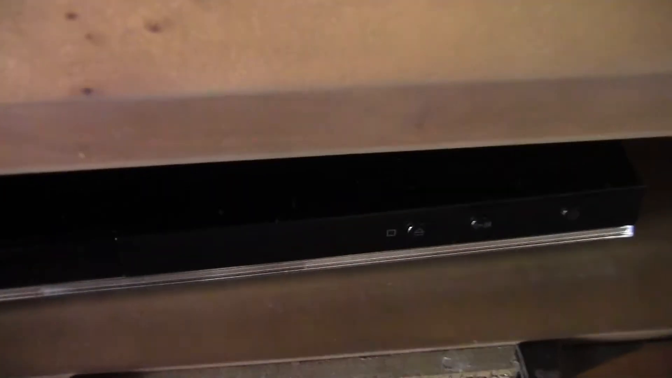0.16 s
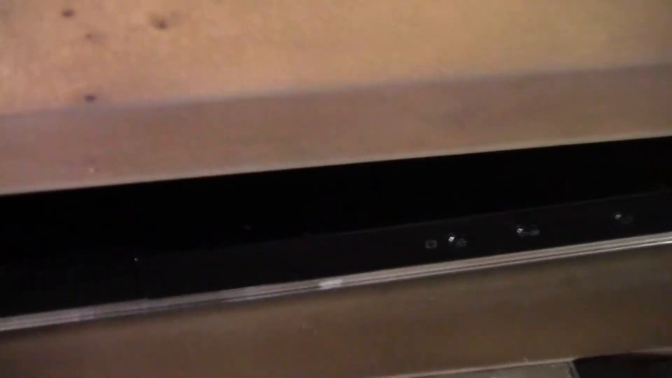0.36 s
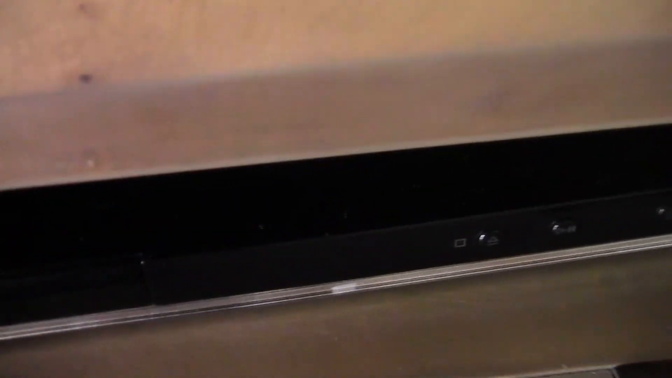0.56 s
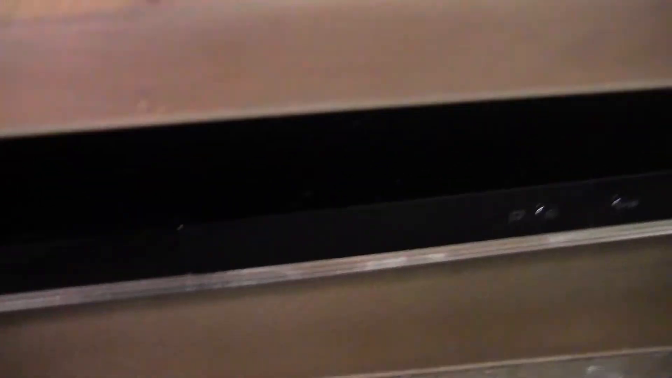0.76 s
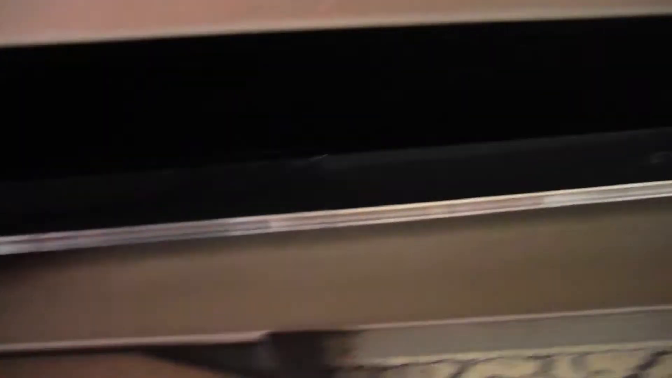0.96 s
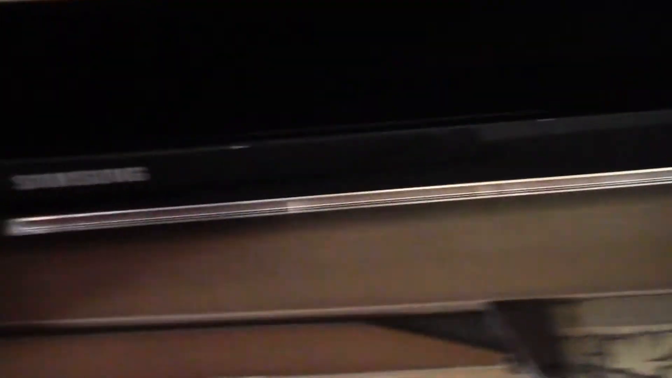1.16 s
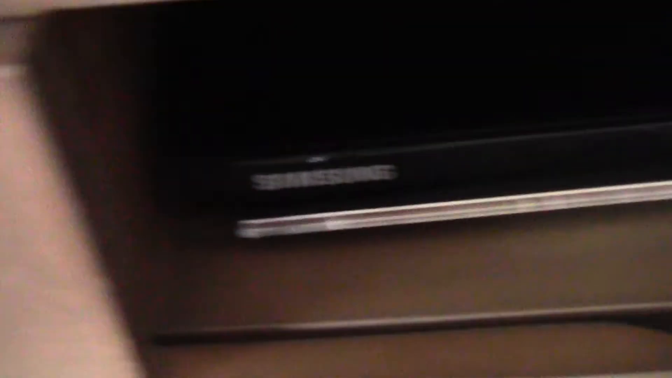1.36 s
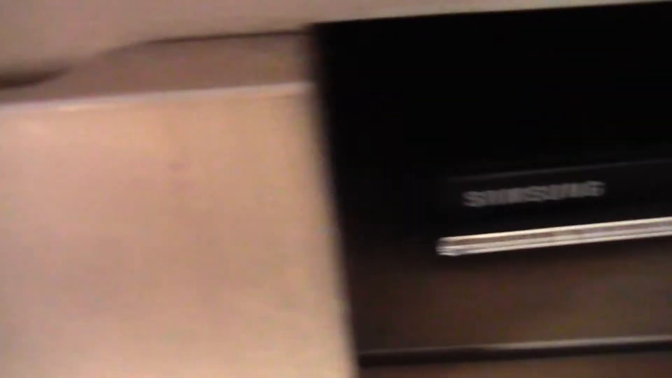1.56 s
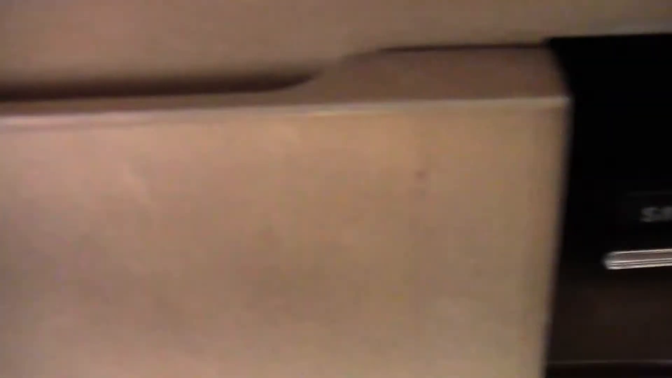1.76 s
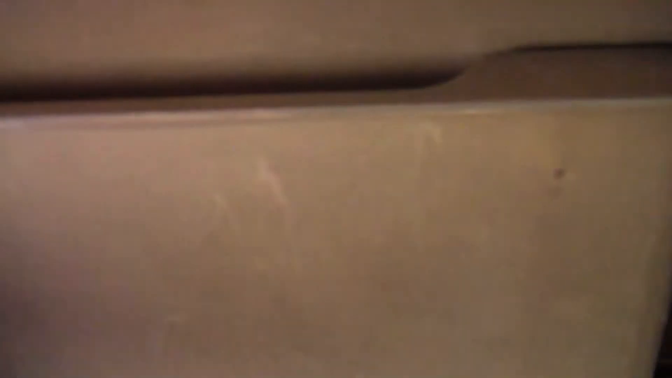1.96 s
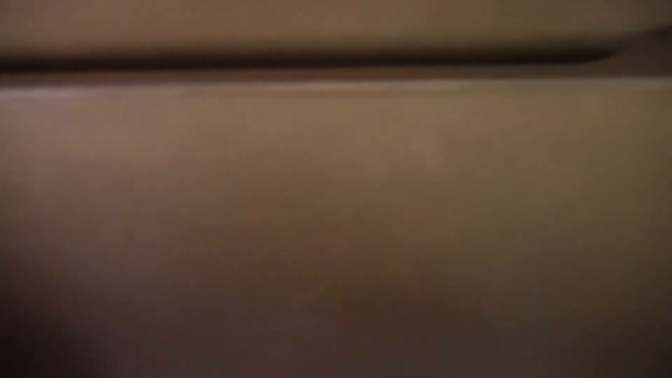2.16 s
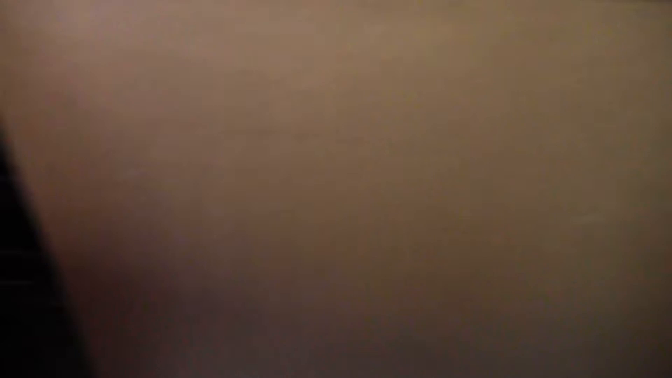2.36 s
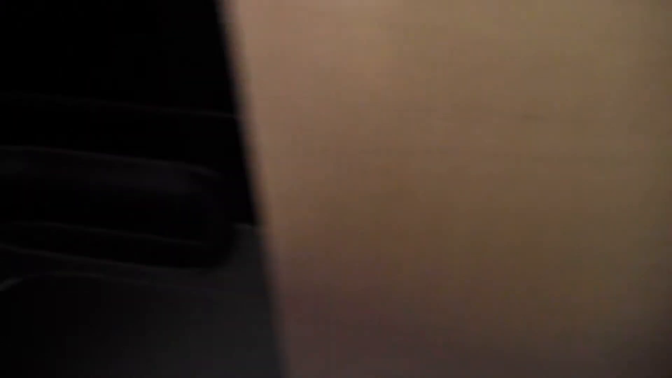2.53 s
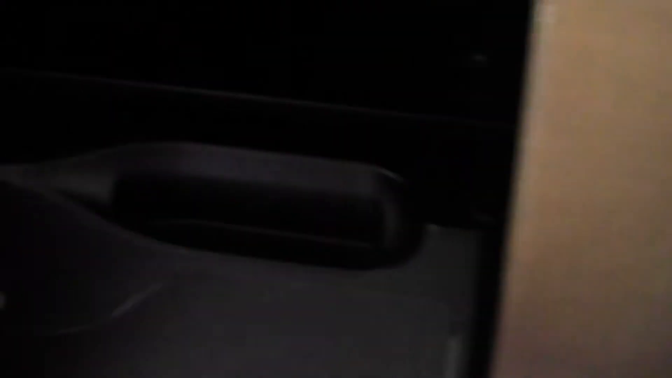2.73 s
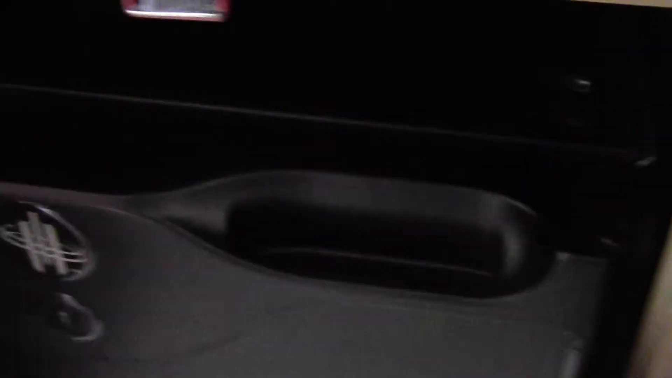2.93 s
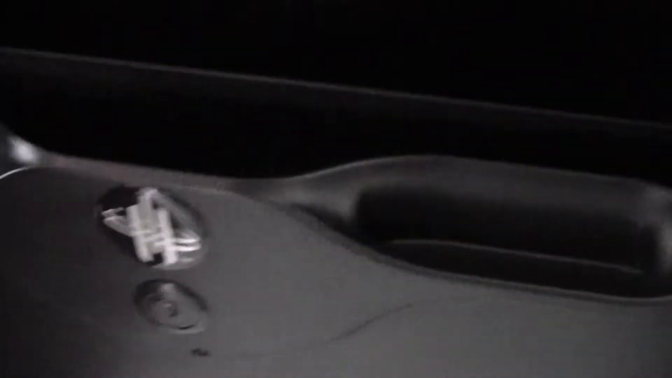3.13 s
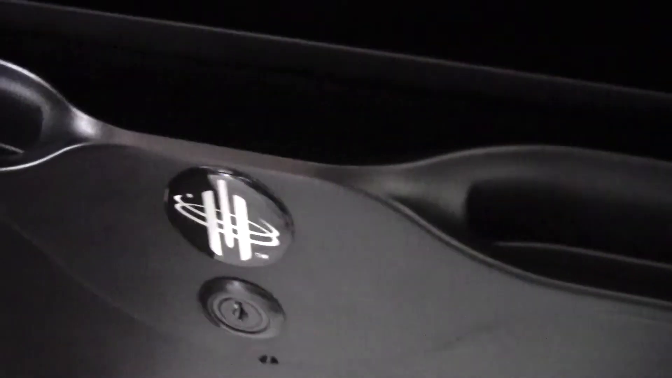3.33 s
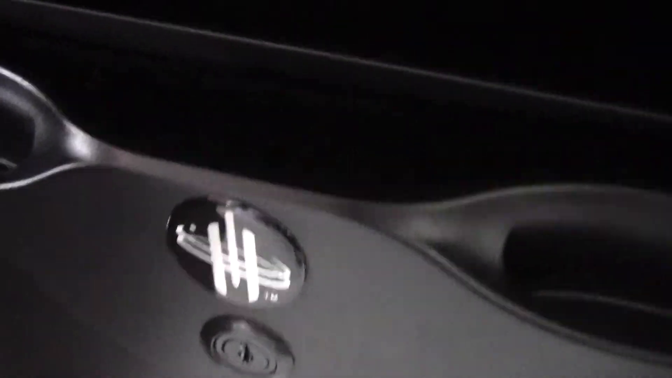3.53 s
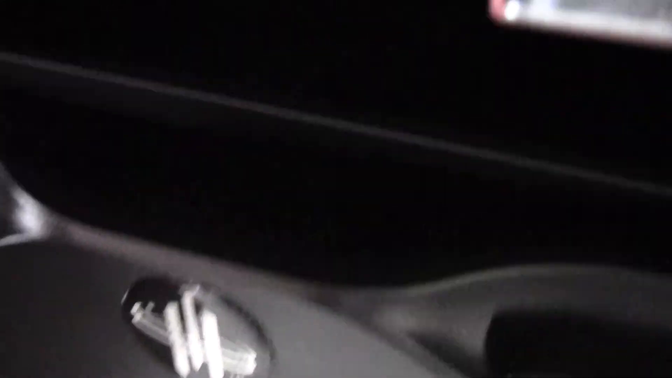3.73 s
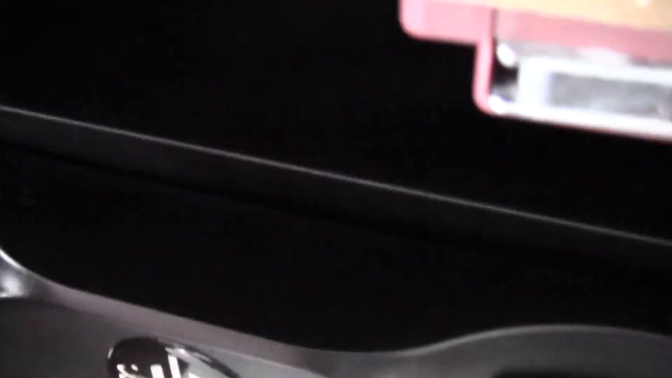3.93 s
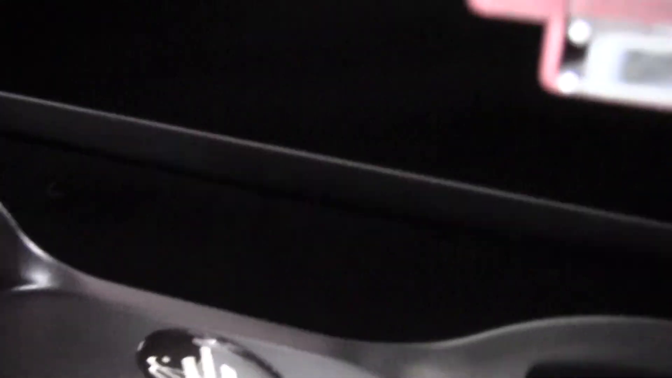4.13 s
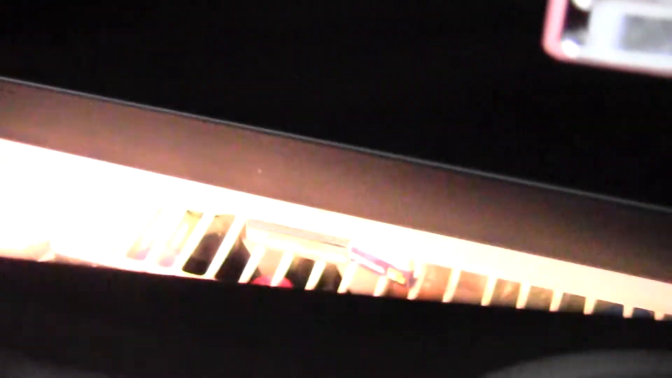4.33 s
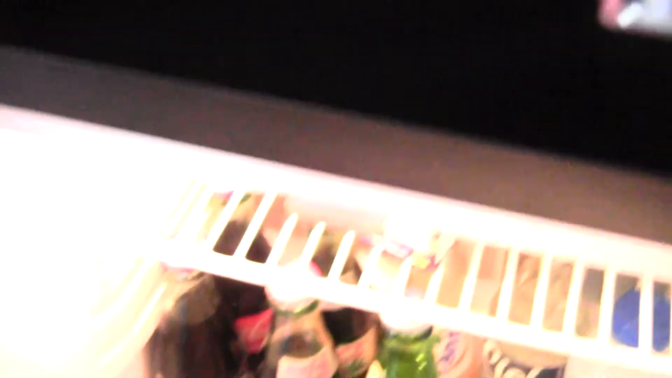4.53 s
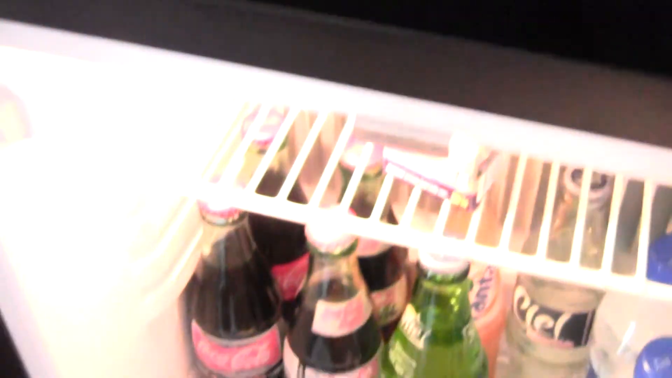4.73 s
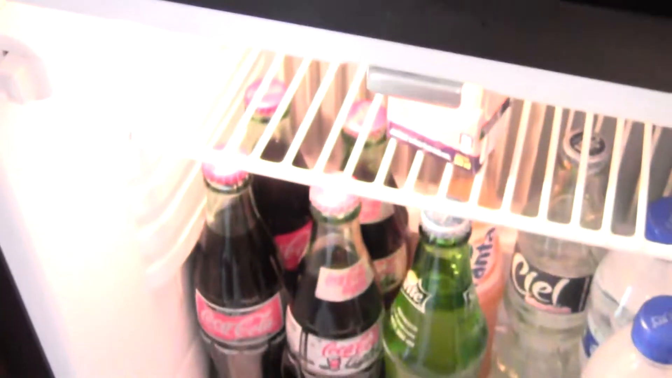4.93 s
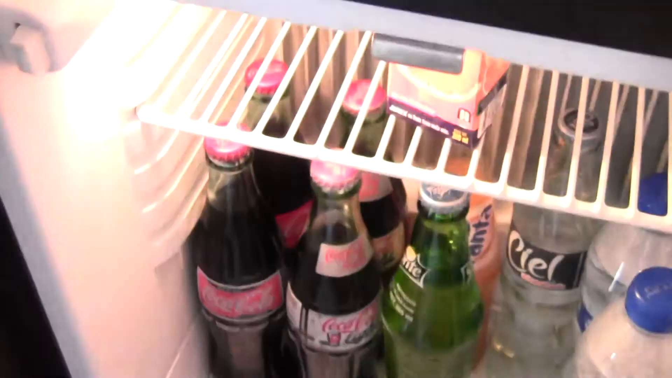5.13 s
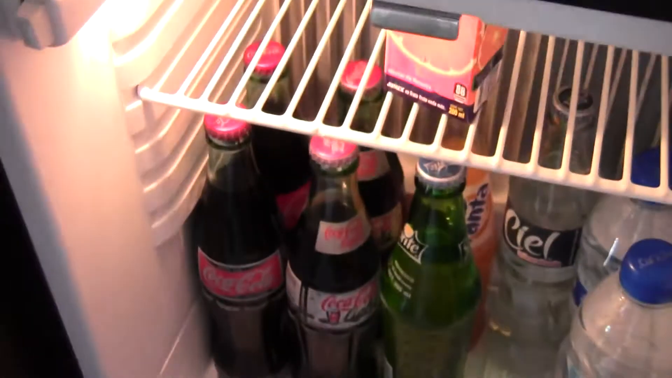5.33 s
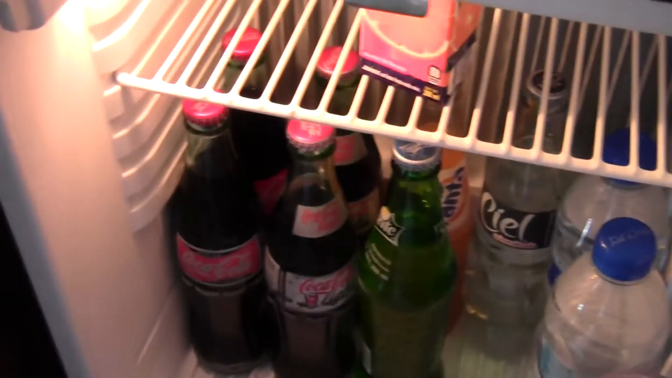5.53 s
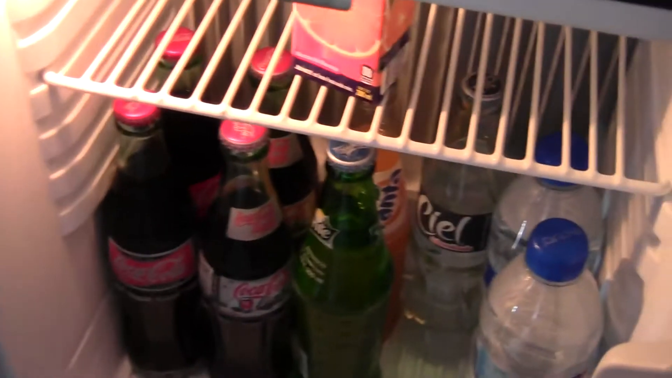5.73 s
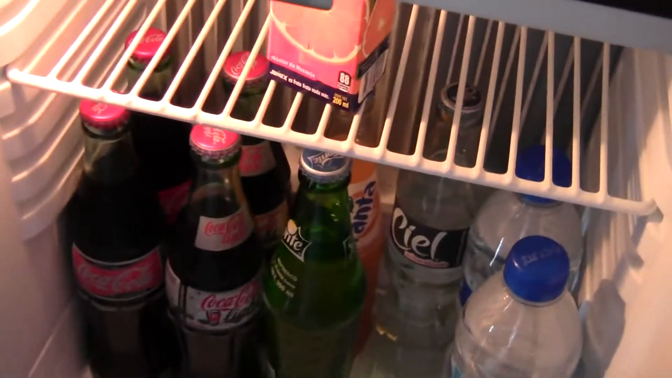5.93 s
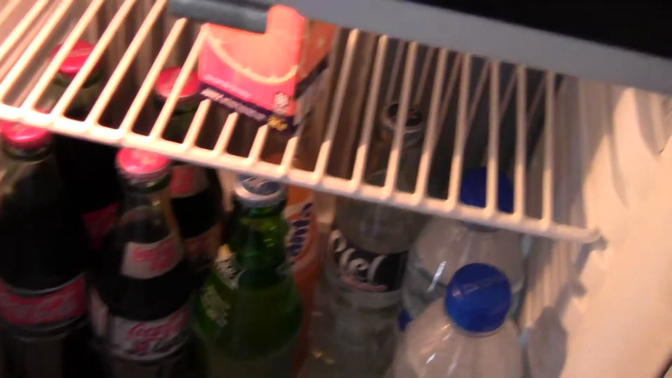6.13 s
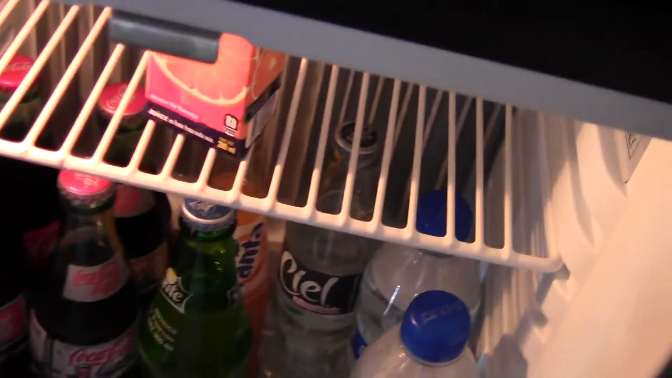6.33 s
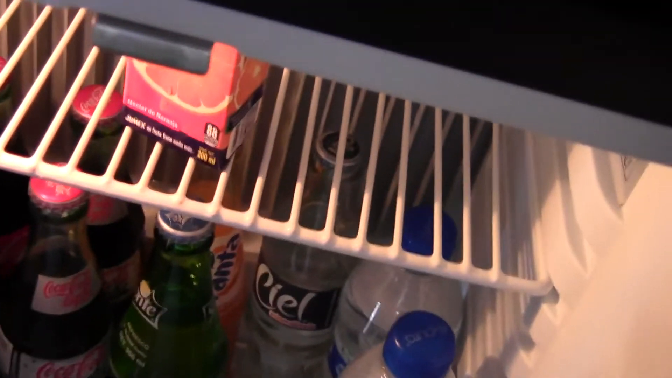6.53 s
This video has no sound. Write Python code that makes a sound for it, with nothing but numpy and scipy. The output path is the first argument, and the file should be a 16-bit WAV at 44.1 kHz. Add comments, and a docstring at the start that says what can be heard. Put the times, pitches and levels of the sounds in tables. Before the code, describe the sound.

Over a steady hum, a cabinet catch clacks, and a fridge door opens with dull thumps, a rattling rack and clinking bottles.

```python
"""A minibar fridge is tugged open close to a hand-held camera's stereo microphone, in a small humming room.
First the wooden cabinet around it snaps off its catch, and its panels ring. Then the fridge's seal
ticks loose, its door flexes and booms, the plastic rack rattles and glass bottles clink against each
other. At the end the swinging door bumps the cabinet. A finger taps the camera once, and mains hum,
fan tones and a faint hiss lie underneath."""
import sys
import numpy as np
from scipy import signal
from scipy.fft import rfft, irfft
from scipy.io import wavfile

SR = 44100
rng = np.random.default_rng(int(sys.argv[2]) if len(sys.argv) > 2 else 0)


def to_wav(sig):
    """Store sig (one row per channel, or 1-D mono) as 16-bit WAV at the path in sys.argv[1].

    Samples outside -1..1 are clipped; the rate is SR.
    """
    pcm = np.clip(np.atleast_2d(sig), -1, 1) * 32767
    pcm = np.round(pcm).astype(np.int16)
    wavfile.write(sys.argv[1], SR, pcm.T)  # frames by channels


N = 294489
TIME = np.arange(N) / SR
AGE = np.arange(SR * 3 // 4) / SR  # seconds since a blow

# The small room's decay. Each row: frequency in Hz, t60 in seconds.
ROOM_RING = [(100, 0.28), (400, 0.74), (1500, 0.68), (4000, 0.48), (8000, 0.53), (14000, 0.25)]
# Treble reaches the two microphone ports out of step. Each row: frequency in Hz, side against mid in dB.
PORT_SIDE = [(300, -32), (2000, -19.5), (5000, -16), (9000, -11), (13000, 3)]
# Steady noise at the two ports. Each row: frequency in Hz, left-right likeness from 0 to 1.
PORT_LIKENESS = [(60, 0.93), (150, 1), (380, 0.58), (950, 0.6), (2380, 0.67), (5980, 0.6), (15000, 0.36)]
# The colours of room tone and hiss. Each row: frequency in Hz, relative density in dB.
ROOM_TONE_COLOUR = [(25, -6), (50, -5), (90, 4.5), (160, 2.5), (290, 2.5), (400, -4.5), (600, -4.5),
                    (1000, -9.5), (1700, -12), (3000, -20.5), (5000, -29), (9000, -36.5), (12500, -41),
                    (16000, -44.5)]
HISS_COLOUR = [(200, -18.5), (600, 12), (1800, 6), (4000, 0.5), (7000, -3), (9500, -6), (12000, -14.5),
               (16000, -30)]
# The hiss sinks once the microphone is at the fridge. Each row: time in seconds, level in dB.
HISS_LEVEL = [(0, -56), (.52, -61.5), (1.3, -62.5), (4.2, -63.5), (5.6, -67), (6.68, -80)]
# Brief swells of the hiss. Each row: peak time in seconds, level in dB.
HISS_SWELLS = [(.76, -62.5), (2.98, -56), (3.23, -57.5), (3.76, -67), (4.06, -61), (5.21, -62), (5.58, -65)]
# Appliance hum. Each row: multiple of the mains frequency, opening level in dB.
MAINS_HARMONICS = [(1, -48), (2, -57.5)]
# Fan tones. Each row: pitch in Hz, opening level in dB, waver from 0 to 1.
FAN_TONES = [(558, -62, .55), (517, -71, .8), (101, -62, 0.9), (241.3, -71, 0.1), (303, -62.5, 0.93)]
# The hum changes as the microphone moves through the room. Each row: time in seconds, gain in dB.
HUM_GAIN = [(0, 0), (1.5, 1.5), (2.7, -2.5), (3.6, -5), (5.3, -3.5), (6.68, -7)]
# A finger on the camera body. Each row: start in seconds, level in dB, pitch in Hz, t60 in seconds.
CAMERA_BUMPS = [(3.2058, -20.5, 239, 0.041)]

# Dense modes of struck wood and plastic. Each row: frequency in Hz, relative density in dB.
WOOD_COLOUR = [(25, -13), (70, -4), (180, 17), (620, 3), (850, -2.5), (1650, 5.5), (2100, -2.5), (2700, 3),
               (3900, -8.5), (4700, -8), (5600, -15.5), (9500, -23.5), (12000, -38), (16000, -65)]
PLASTIC_COLOUR = [(30, 4), (90, 3.5), (200, 6), (370, -4.5), (680, -1), (1100, -8), (1600, -3), (2100, -8),
                  (2800, -8.5), (4000, -13.5), (7500, -23), (10000, -31.5), (12500, -45), (14500, -62.5),
                  (16000, -65)]
# Their decay. Each row: frequency in Hz, base t60 in seconds.
WOOD_RING = [(100, 0.2), (600, 0.36), (2000, 0.074), (5000, 0.02), (12000, 0.14)]
PLASTIC_RING = [(100, 0.067), (700, 0.16), (2000, 0.1), (5000, 0.086), (12000, 0.078)]
# Strong modes of the cabinet, the rack and the bottles, which ring at slightly different pitches.
# Each row: pitch in Hz, relative level in dB, base t60 in seconds.
CABINET_MODES = [(205, -6, 0.13), (257.7, 7, 0.25), (292.4, 5, 0.21), (535, -15, 0.091), (612, -15.5, 0.41),
                 (671, -7.5, 0.38), (925, -16, 0.26), (1479, -11, 0.16), (1775, -12, 0.09)]
RACK_MODES = [(482.5, -16, 0.49), (654.3, -3.5, 0.14), (782, -2, 0.038), (951, -7.5, 0.15),
              (1140, -9.5, 0.18), (1375, -10.5, 0.26), (2730, -24, 0.049)]
GLASS_MODES = [(3284, 1.5, 0.22), (3380, -13, 0.724), (3420, -8.5, .24), (3490, -11.5, 0.24),
               (3555, -9, 0.22), (4070, -29.5, .3), (5470, -22.5, 0.36), (5685, -38, 0.27),
               (6100, -19.5, 0.042), (6290, -16.5, 0.083), (6363, -16, 0.27), (6580, -16, 0.17),
               (6520, -18, 0.094), (8150, -19.5, 0.1), (8830, -24, 0.17), (8850, -34, 0.091),
               (9570, -27.5, 0.089), (9570, -25, 0.17), (10070, -33, 0.084), (10900, -36.5, 0.0893)]
# Blows as the cabinet opens, and as the swinging door bumps it. Each row: start in seconds, level in dB,
# treble and bass against that level in dB, ring time factor, pitch of the struck spot in Hz.
CABINET_BLOWS = [(1.468, -43.5, -10.5, -15, 4.3, 2140), (1.783, -43, 6.5, -11, 1.7, 2920),
                 (1.821, -27, -16.5, -6, 0.91, 1700), (1.936, -16.5, 14.5, 3, 0.35, 4870),
                 (1.938, -20, 4.5, -8.5, .7, 4700), (1.9435, -9.5, -10, -8, 0.48, 560),
                 (1.950, -17.5, -7.5, -18, 0.65, 2540), (1.965, -22, -2, -4.5, 1.06, 2440),
                 (1.986, -35.5, -9, 8, 1.43, 299), (2.0425, -26.5, 5.5, -17, 0.91, 6900),
                 (2.046, -24.5, 6, -10, 0.45, 3600)]
DOOR_BUMPS = [(5.825, -49, -2, -16, 0.54, 3320), (5.861, -34, -35, 7.5, 0.97, 368),
              (5.8885, -36.5, -1.5, 0, 0.31, 1320), (5.893, -31.5, -8, 5, 0.58, 805),
              (6.103, -46, -23, 9.5, 1.8, 350)]
# The sticky door seal letting go. Each row: start in seconds, level in dB.
SEAL_TICKS = [(4.133, -50), (4.214, -48.5), (4.283, -40.5), (4.346, -29), (4.353, -38), (4.357, -30.5)]
# Door panels flexing under hand and load. Each row: start in seconds, level in dB, base pitch in Hz.
PANEL_BOOMS = [(1.654, -20, 107), (1.822, -29, 73), (1.936, -26, 77), (1.948, -29, 154), (2.271, -35, 105),
               (4.193, -30.5, 143), (4.314, -18, 126.4), (4.34, -26.5, 130), (4.426, -18, 169.6),
               (4.528, -16, 186), (4.625, -14, 191.5), (4.755, -23, 193.7), (4.87, -16, 182),
               (4.932, -20, 174.5), (5.895, -29.5, 77), (5.907, -31.5, 154.3), (6.112, -36.5, 80),
               (6.139, -31.5, 151)]
# A flexing panel's modes. Each row: ratio to the base pitch, relative level in dB, t60 in seconds.
PANEL_MODES = [(0.98, 1.5, 0.23), (.84, -8.5, 0.49)]
# Knocks of the fridge door and its rack. Each row: start in seconds, level in dB,
# treble and bass against that level in dB, pitch of the struck spot in Hz.
RACK_KNOCKS = [(3.346, -41.5, -10, -25, 2040), (4.042, -40.5, 6.5, 6.5, 3090), (4.191, -37, 9.5, 9.5, 8200),
               (4.289, -23, 16.5, 6, 1110), (4.317, -26, 17.5, 8.5, 590), (4.394, -22.5, -28, -8, 670),
               (4.516, -23, -12, -3, 626), (4.533, -16.5, -23, -10, 900), (4.619, -23.5, 6, 2.5, 830),
               (4.690, -31, -14, 7, 1020), (4.755, -29.5, -14, -6, 680), (4.775, -28.5, -13, -11, 655),
               (4.826, -22, 1.5, -19, 2770), (4.866, -19.5, -11, -17, 1800),
               (4.906, -27.5, -1.5, -18, 1320), (4.932, -30.5, -2, 8, 1260)]
# How hard the pull shakes the loose load. Each row: time in seconds, level in dB.
LOAD_SHAKE = [(4.255, -40.5), (4.3, -22.5), (4.37, -26.5), (4.43, -34.5), (4.49, -25.5), (4.59, -32.5)]
# Bottles touching. Each row: start in seconds, level in dB, brightness in dB per octave,
# ring time factor, partial that the point of contact favours in Hz.
CLINKS = [(4.292, -37.5, 11, 1.3, 5500), (4.319, -14.5, 7, 0.34, 8800), (4.459, -30.5, 7.5, .75, 8800),
          (4.495, -39.5, 13.5, 0.5, 6400), (4.518, -16, 9, 0.57, 3187), (4.563, -28.5, -15, 1.2, 3114),
          (4.794, -41.5, 2, 1.4, 5550), (4.894, -41, 1, 1.2, 8870), (4.929, -51, -3, 1.1, 3510)]


def amp(db):
    return 10 ** (np.asarray(db) / 20)


def unit_rms(x):
    return x / np.sqrt(np.mean(x ** 2) + 1e-20)


def at_hz(points, hz):
    """Reads a table on a log-frequency axis."""
    table_hz, value = np.transpose(points)
    return np.interp(np.log(hz + 1), np.log(table_hz + 1), value)


def follow(curve):
    """Reads a time curve at every sample."""
    return np.interp(TIME, *np.transpose(curve))


def add(mix, start_s, sound):
    part = mix[round(start_s * SR):][:len(sound)]
    part += sound[:len(part)]


def drift(rate_hz):
    """A slow random wander of rms 1."""
    hz = np.fft.rfftfreq(N, 1 / SR)
    return unit_rms(irfft(rfft(rng.standard_normal(N)) * np.exp(-(hz / rate_hz) ** 2), N))


def coloured(x, db_at, size=2048):
    """Minimum-phase filter with the given dB at each frequency."""
    hz = abs(np.fft.fftfreq(size, 1 / SR))
    log_gain = np.log(amp(np.maximum(db_at(hz), -100)))
    impulse = np.fft.ifft(np.exp(np.conj(signal.hilbert(log_gain)))).real
    return signal.fftconvolve(x, impulse)[:len(x)]


def decay(t60):
    """Falls by 60 dB in t60 seconds."""
    return np.exp(-np.log(1000) * AGE / t60)


def dying_noise(ring, stretch=1, count=14):
    """A dense crowd of modes: white noise whose bands each die at their own speed."""
    hz = np.fft.rfftfreq(len(AGE), 1 / SR)
    white = rfft(rng.choice([-1, 1], len(AGE)))
    centres = np.geomspace(60, 15000, count)
    bands = np.array([irfft(white * at_hz(np.c_[centres, row], hz), len(AGE)) for row in np.eye(count)])
    return (bands * decay(stretch * at_hz(ring, centres)[:, None])).sum(0)


def ring_modes(hz, db, t60, phase):
    """A sum of dying sines, with phases in cycles."""
    return amp(db) @ (decay(t60[:, None]) * np.sin(2 * np.pi * (hz[:, None] * AGE + phase[:, None])))


def room(x, wet_db, side_db=-12, build_s=0.0057, dull_hz=11000):
    """A close source in a small furnished room; the tail differs a little between the microphone ports."""
    build = 1 - np.exp(-(AGE / build_s) ** 2)
    dull = signal.butter(1, dull_hz, fs=SR)
    tails = [signal.lfilter(*dull, dying_noise(ROOM_RING)) * build for _ in range(2)]
    mid, side = (amp(wet_db) * signal.fftconvolve(x, tail / np.linalg.norm(tail))[:N] for tail in tails)
    out_of_step = irfft(1j * rfft(x) * amp(at_hz(PORT_SIDE, np.fft.rfftfreq(N, 1 / SR))), N)
    side = amp(side_db) * side + out_of_step
    return x + mid + np.array([side, -side])


def air(colour, swell_db):
    """Steady noise at two closely spaced microphone ports, most alike in the bass."""
    hz = np.fft.rfftfreq(N, 1 / SR)
    likeness = at_hz(PORT_LIKENESS, hz)
    spectra = rfft(rng.standard_normal((2, N))) * amp(at_hz(colour, hz))
    mid, side = spectra * np.sqrt([1 + likeness, 1 - likeness])
    return unit_rms(irfft(np.array([mid + side, mid - side]), N)) * amp(swell_db * drift(rate_hz=1.5))


def hiss(swell_s=0.077):
    """A faint hiss with a few soft swells."""
    swells = sum(amp(db) ** 2 * np.exp(-((TIME - s) / swell_s) ** 2) for s, db in HISS_SWELLS)
    return np.sqrt(amp(follow(HISS_LEVEL)) ** 2 + swells) * air(HISS_COLOUR, swell_db=0.5)


def hum(mains_hum_hz=119.9, waver_hz=7):
    """Mains hum and wavering fan tones change with the microphone's place, the hum's fundamental least."""
    out = np.zeros(N)
    gain = amp(follow(HUM_GAIN))
    for multiple, db in MAINS_HARMONICS:
        level = amp(db) * gain ** (0.49 if multiple == 1 else 1)
        out += level * np.sqrt(2) * np.sin(2 * np.pi * multiple * mains_hum_hz * TIME)
    for hz, db, waver in FAN_TONES:
        phasor = np.sqrt(2 * (1 - waver ** 2)) + waver * (drift(waver_hz) + 1j * drift(waver_hz))
        out += amp(db) * gain * (phasor * np.exp(2j * np.pi * hz * TIME)).real
    return out


def camera_bump(dull_hz=1500):
    """Handling noise: a finger's dull tap reaches the microphone through the housing."""
    out = np.zeros(N)
    for s, db, hz, t60 in CAMERA_BUMPS:
        add(out, s, amp(db) * decay(t60) * np.cos(2 * np.pi * hz * AGE))
    return signal.lfilter(*signal.butter(2, dull_hz, fs=SR), out)


def struck_panel(blows, colour, ring, modes, modes_db, bass_hz, treble_hz, detune,
                 spot_db, spot_octaves, snap, snap_s):
    """Blows set off a panel's dense modes and its few strong ones; hard ones are bright, heavy ones deep."""
    out = np.zeros(N)
    mode_hz, mode_db, mode_t60 = np.transpose(modes)
    phase = np.arange(len(modes)) / 2  # neighbouring modes start in opposite directions
    colour_rms = np.sqrt(np.mean(amp(at_hz(colour, np.linspace(0, SR / 2, len(AGE)))) ** 2))
    for s, db, treble_db, bass_db, stretch, spot_hz in blows:
        def tilt(hz):
            spot = spot_db * np.exp(-(np.log2((hz + 1) / spot_hz) / spot_octaves) ** 2)
            treble = treble_db * hz ** 2 / (hz ** 2 + treble_hz ** 2)
            bass = bass_db / (1 + (hz / bass_hz) ** 4)
            return spot + treble + bass
        contact = 1 + snap / stretch * np.exp(-AGE / snap_s)  # the first wavefront stands out
        crack = coloured(contact * dying_noise(ring, stretch), lambda hz: at_hz(colour, hz) + tilt(hz))
        pitch = mode_hz * (1 + detune * rng.standard_normal(len(modes)))
        tone = ring_modes(pitch, mode_db + modes_db + tilt(mode_hz), mode_t60 * np.sqrt(stretch), phase)
        add(out, s, amp(db) * (crack / colour_rms + tone))
    return out


def cabinet_door():
    """The wooden door snaps off its catch, close to the microphone."""
    return struck_panel(CABINET_BLOWS, WOOD_COLOUR, WOOD_RING, CABINET_MODES, modes_db=-4,
                        bass_hz=434, treble_hz=3060, detune=0.0033,
                        spot_db=7, spot_octaves=0.17, snap=0.52, snap_s=0.00087)


def plastic(blows, modes_db=-4, spot_db=8, lowest_hz=85):
    """Blows on the fridge door and its rack, which are too small to radiate deep bass."""
    knocks = struck_panel(blows, PLASTIC_COLOUR, PLASTIC_RING, RACK_MODES, modes_db=modes_db,
                          bass_hz=425, treble_hz=3000, detune=0.0295,
                          spot_db=spot_db, spot_octaves=0.28, snap=0.094, snap_s=0.0013)
    return signal.lfilter(*signal.butter(2, lowest_hz, "highpass", fs=SR), knocks)


def door_seal(treble_db=17, bass_db=-6, stretch=0.3, spot_hz=8800):
    """The seal peels off in dry, bright ticks."""
    return plastic([(s, db, treble_db, bass_db, stretch, spot_hz) for s, db in SEAL_TICKS])


def door_booms(rise_s=0.016, lowest_hz=55):
    """A soft push swings a door panel for a few cycles; its lower mode lingers."""
    out = np.zeros(N)
    ratio, mode_db, t60 = np.transpose(PANEL_MODES)
    swell = np.sin(np.pi / 2 * np.minimum(AGE / rise_s, 1)) ** 2
    for s, db, hz in PANEL_BOOMS:
        add(out, s, amp(db) * swell * ring_modes(hz * ratio, mode_db, t60, np.zeros(len(ratio))))
    return signal.lfilter(*signal.butter(2, lowest_hz, "highpass", fs=SR), out)


def rack_knocks(rebound_s=0.011, rebound_db=-4.5, rebound_treble_db=-18, doubling_db=30.5):
    """The load knocks the rack and falls back once, weaker and duller."""
    blows = []
    for s, db, treble_db, bass_db, spot_hz in RACK_KNOCKS:
        stretch = 0.56 * 2 ** (bass_db / doubling_db)  # heavy knocks ring longer
        blows += [(s, db, treble_db, bass_db, stretch, spot_hz),
                  (s + rebound_s, db + rebound_db, treble_db + rebound_treble_db, bass_db, stretch, spot_hz)]
    return plastic(blows)


def rack_rattle(treble_db=-5, bass_db=-2, stretch=1.45, scatter_db=2, count=16):
    """The shaken load taps a few spots of the rack at random moments."""
    jitter, spot = rng.random((2, count))
    start_s, end_s = LOAD_SHAKE[0][0], LOAD_SHAKE[-1][0]
    times = start_s + (np.arange(count) + jitter) / count * (end_s - start_s)
    levels = np.interp(times, *np.transpose(LOAD_SHAKE)) + scatter_db * rng.standard_normal(count)
    spots_hz = np.geomspace(560, 1450, 5)
    taps = [plastic([(0.00018, 0.004, treble_db, bass_db, stretch, hz)])[:len(AGE)] for hz in spots_hz]
    out = np.zeros(N)
    for s, db, k in zip(times, levels, (spot * len(taps)).astype(int)):
        add(out, s, amp(db) * taps[k])
    return out


def bottle_touches(choke=0.63, first_rise_s=0.0085, second_rise_s=0.00502, gap_s=0.009):
    """Bottles meet twice in every clink: a bright, choked touch, then a darker one that rings on."""
    for s, db, db_per_octave, stretch, favoured_hz in CLINKS:
        yield s, db, db_per_octave, first_rise_s, stretch * choke, favoured_hz
        yield s + gap_s, db - 1, db_per_octave - 5, second_rise_s, stretch, favoured_hz


def bottles(favour_db=8.5, favour_octaves=0.061, scatter_db=-1.5, detune=0.0025,
            grind=0.27, grind_hz=110, grind_s=0.018):
    """Glass chatters on glass: the ring builds over milliseconds and is rough while the bottles touch."""
    out = np.zeros(N)
    hz, mode_db, t60 = np.transpose(GLASS_MODES)
    for s, db, db_per_octave, rise_s, stretch, favoured_hz in bottle_touches():
        scatter, shift, phase = rng.standard_normal((3, len(hz)))
        favour = favour_db * np.exp(-(np.log2(hz / favoured_hz) / favour_octaves) ** 2)
        partial_db = mode_db + favour + db_per_octave * np.log2(hz / hz[0]) + scatter_db * scatter
        ring = ring_modes(hz * (1 + detune * shift), partial_db, t60 * stretch, phase)
        rubbing = signal.lfilter(*signal.butter(1, grind_hz, fs=SR), rng.standard_normal(len(AGE)))
        roughness = 1 + grind * unit_rms(rubbing) * np.exp(-AGE / grind_s)
        add(out, s, amp(db) * ring * np.minimum(AGE / rise_s, 1) * roughness)
    return out


def scene():
    """Doors and bottles close to the microphone, with the room's hum and hiss behind them."""
    cabinet = cabinet_door()
    fridge = rack_knocks() + door_seal() + rack_rattle() + plastic(DOOR_BUMPS, modes_db=-17, spot_db=14)
    doors = room(cabinet, wet_db=-17.5) + room(fridge, wet_db=-19.5) + room(door_booms(), wet_db=-24)
    background = hum() + amp(-50) * air(ROOM_TONE_COLOUR, swell_db=0.35) + hiss()
    return background + camera_bump() + doors + room(bottles(), wet_db=-17)


def record(dry, low_cut_hz=42, ceiling=0.85, high_cut_hz=15800):
    """The recorder cuts the deepest bass, rounds off the highest peaks and limits the band."""
    x = signal.sosfilt(signal.butter(2, low_cut_hz, "highpass", fs=SR, output="sos"), dry)
    x = x / (1 + (x / ceiling) ** 4) ** 0.25
    lowpass = signal.firwin(511, high_cut_hz, window=("kaiser", 9), fs=SR)
    return signal.oaconvolve(x, lowpass[None], "same", axes=1)


dry = scene()
out = record(dry)
to_wav(out)
```